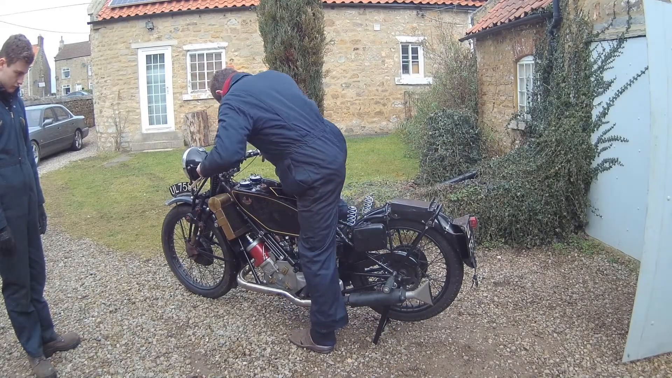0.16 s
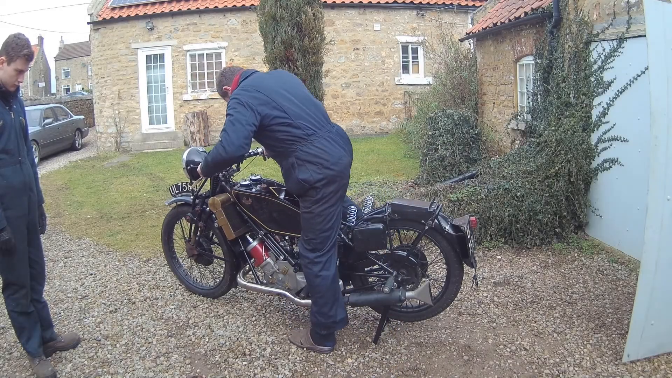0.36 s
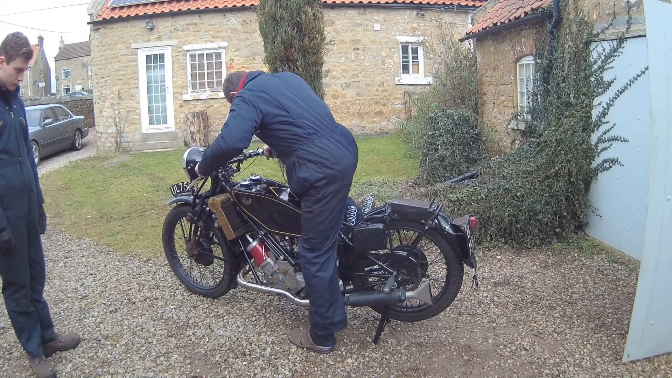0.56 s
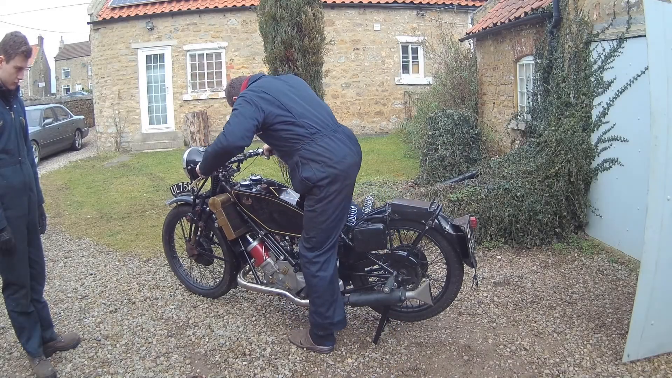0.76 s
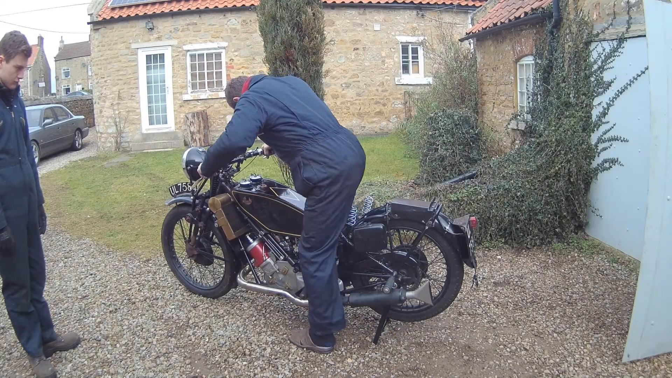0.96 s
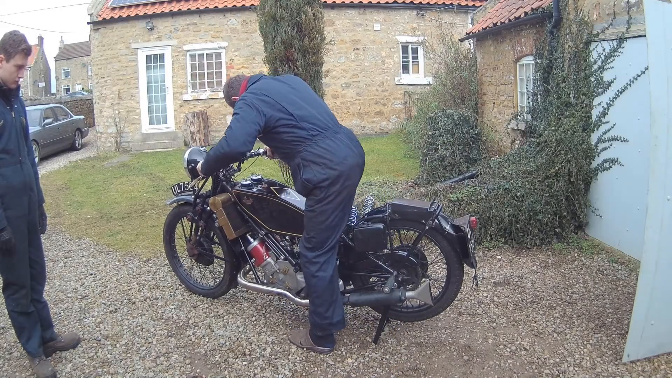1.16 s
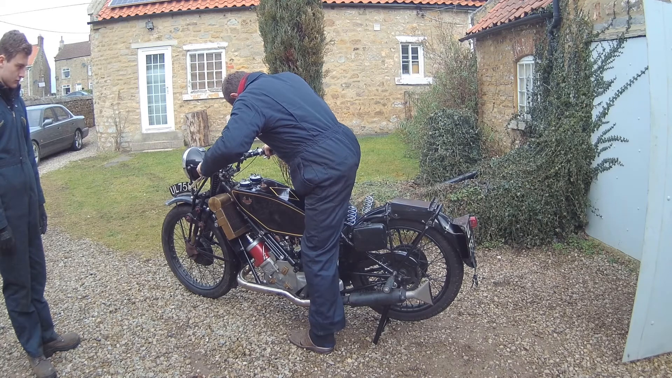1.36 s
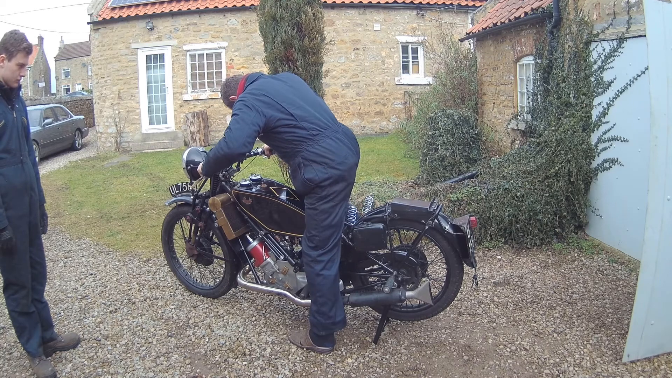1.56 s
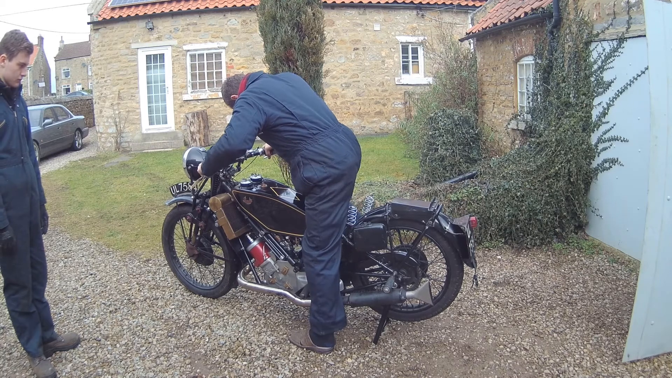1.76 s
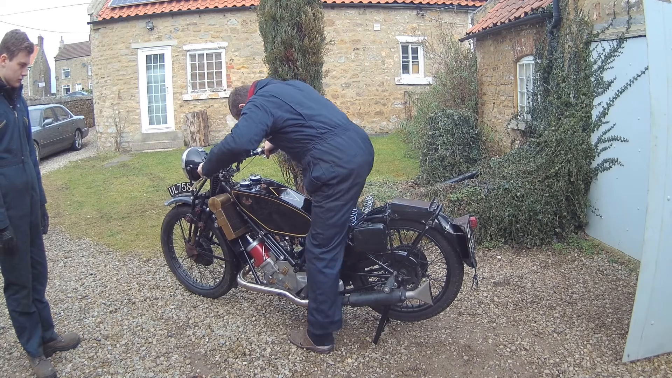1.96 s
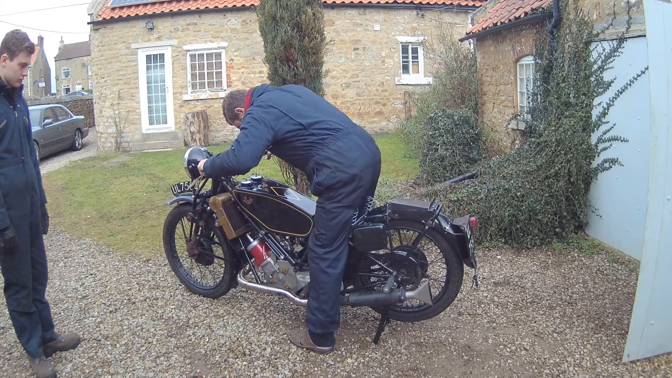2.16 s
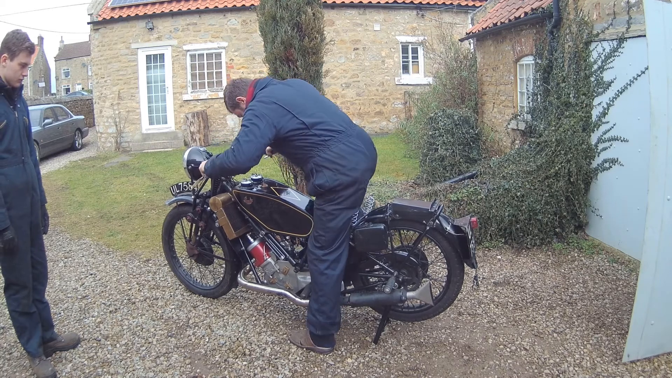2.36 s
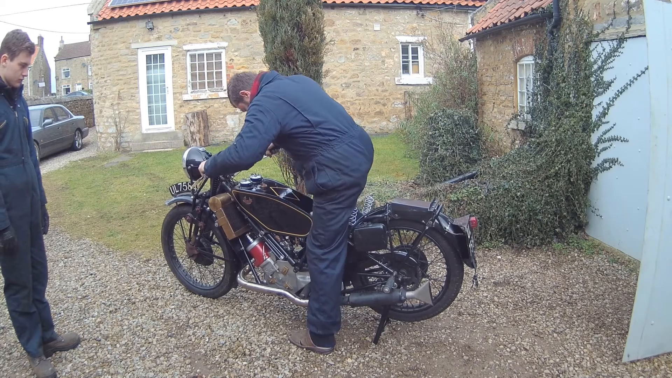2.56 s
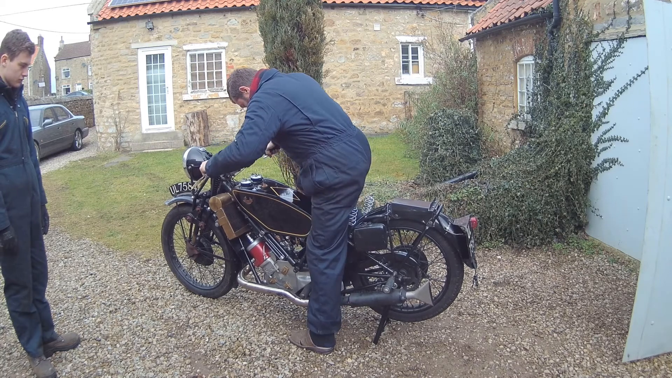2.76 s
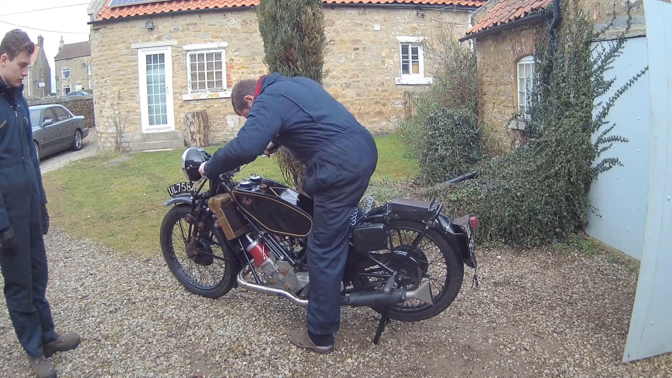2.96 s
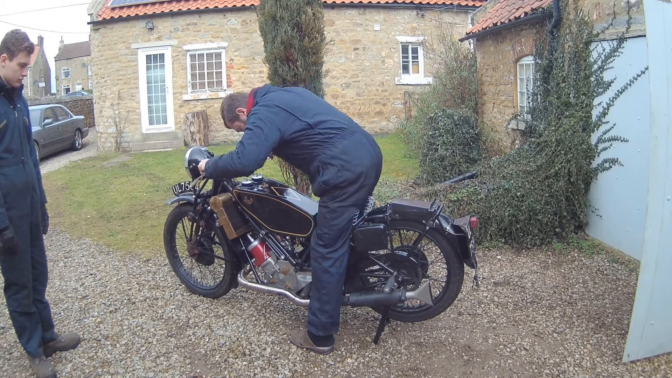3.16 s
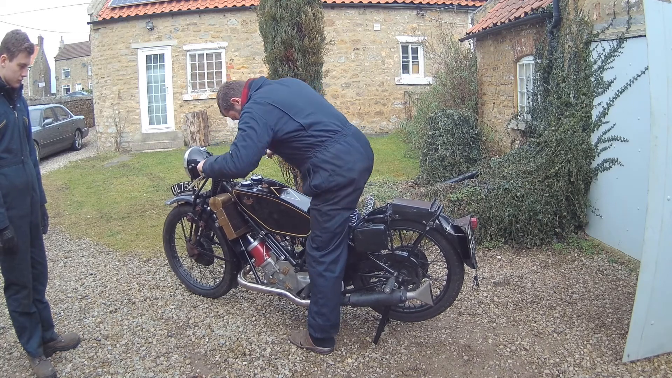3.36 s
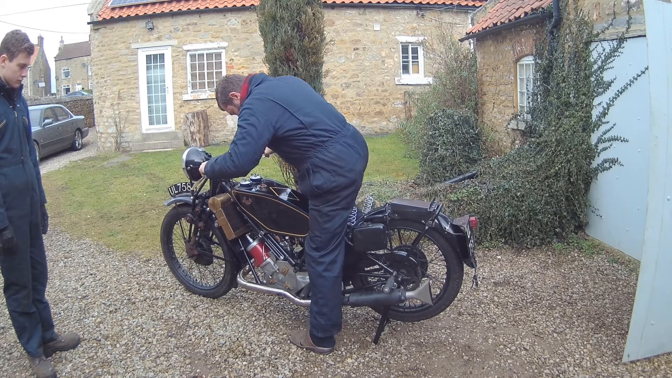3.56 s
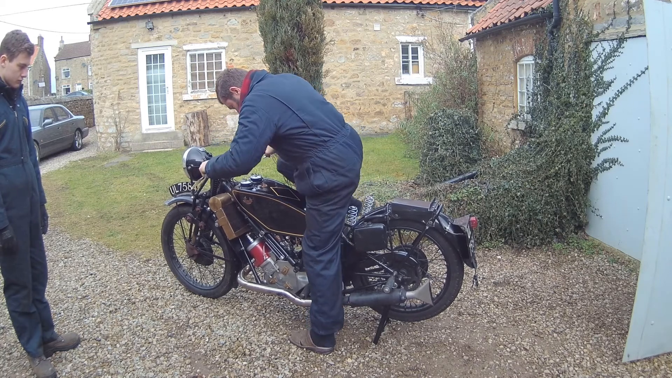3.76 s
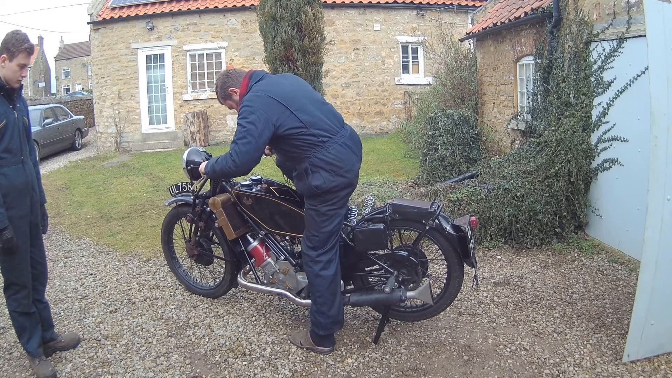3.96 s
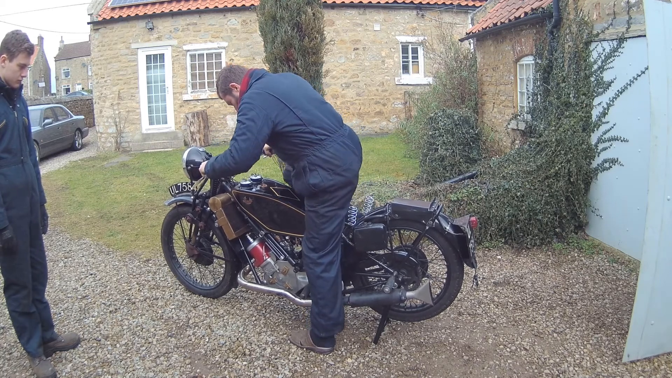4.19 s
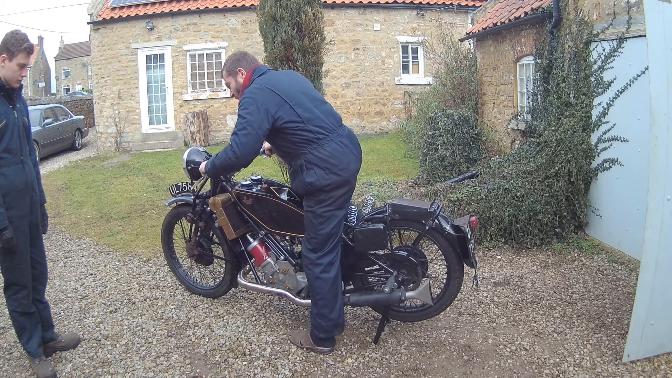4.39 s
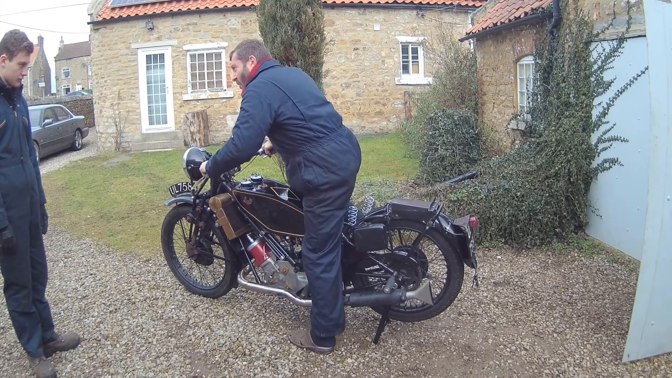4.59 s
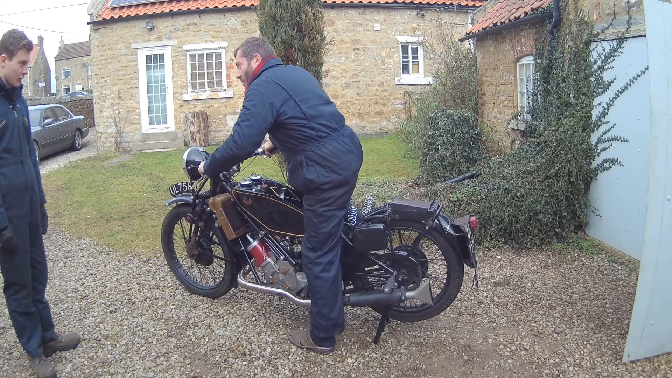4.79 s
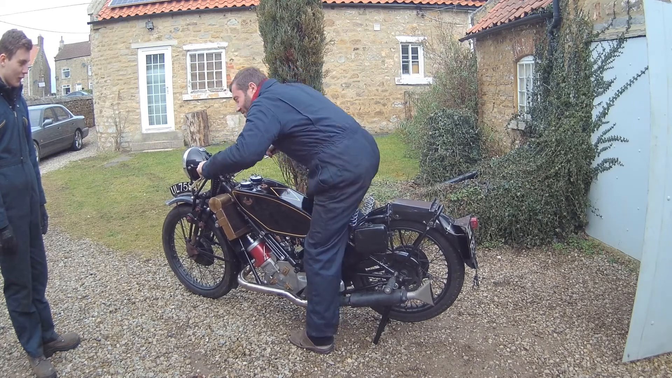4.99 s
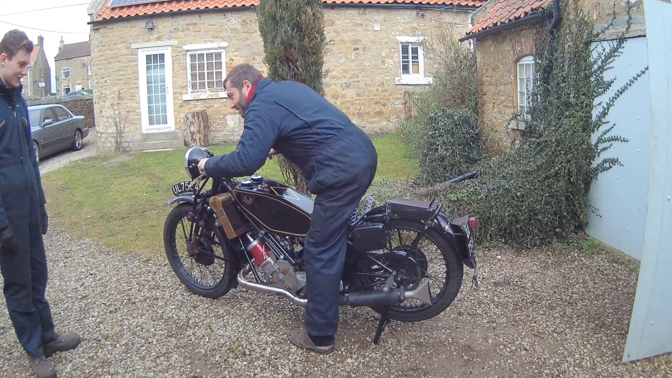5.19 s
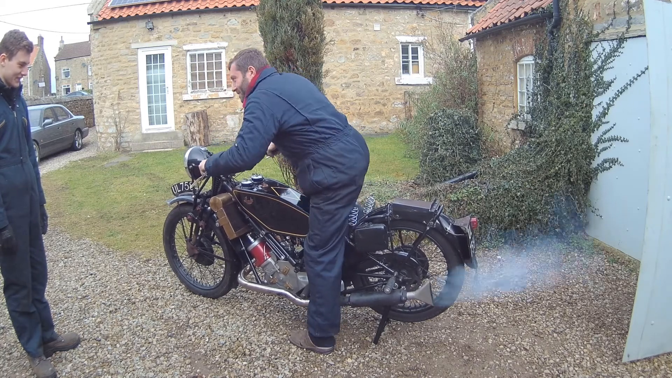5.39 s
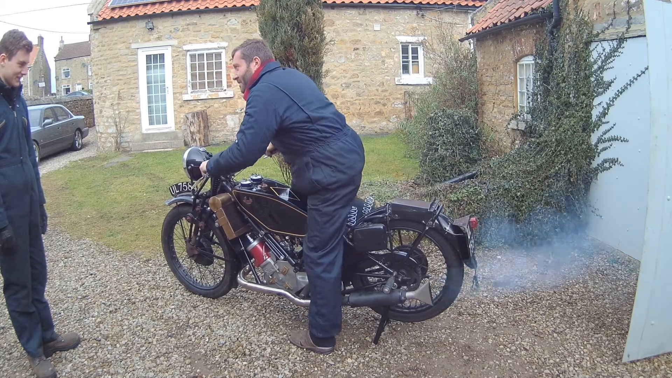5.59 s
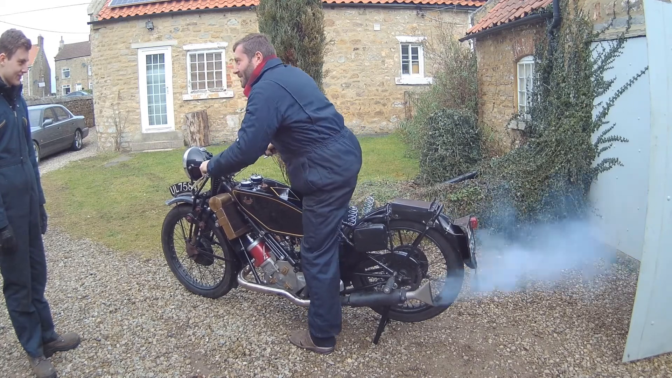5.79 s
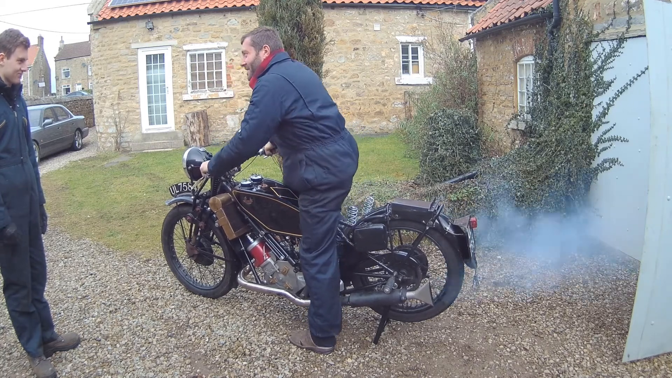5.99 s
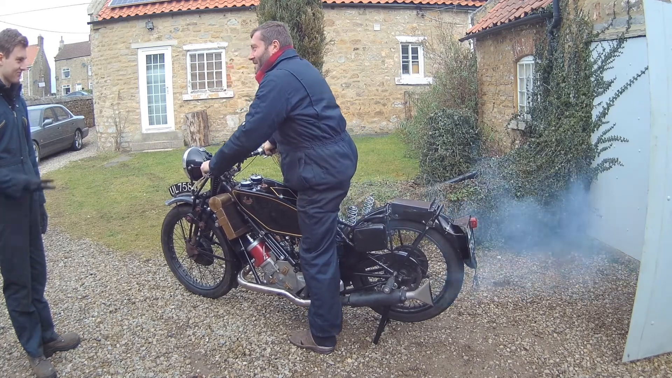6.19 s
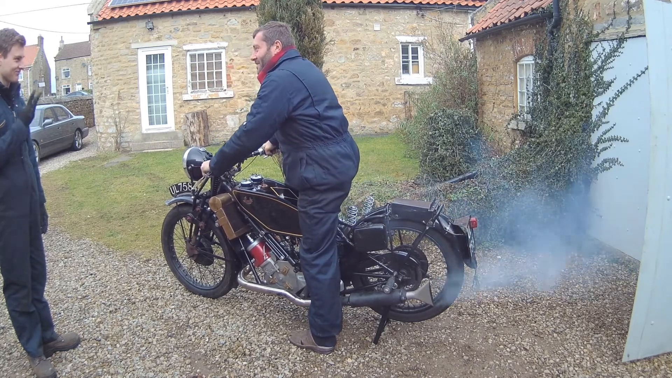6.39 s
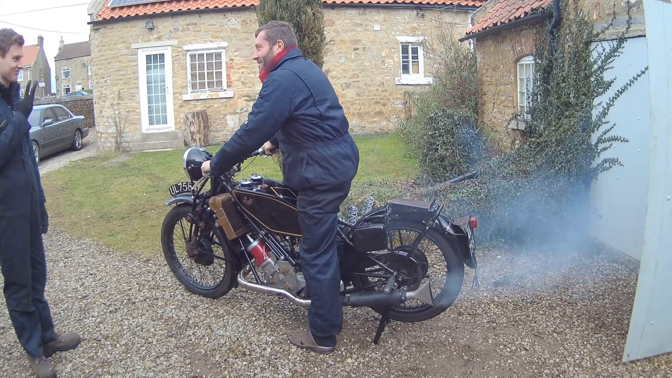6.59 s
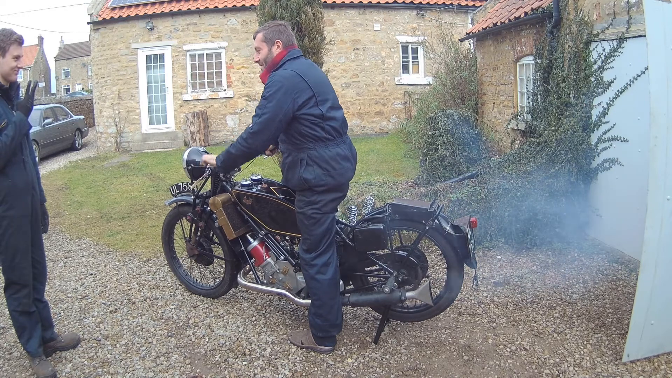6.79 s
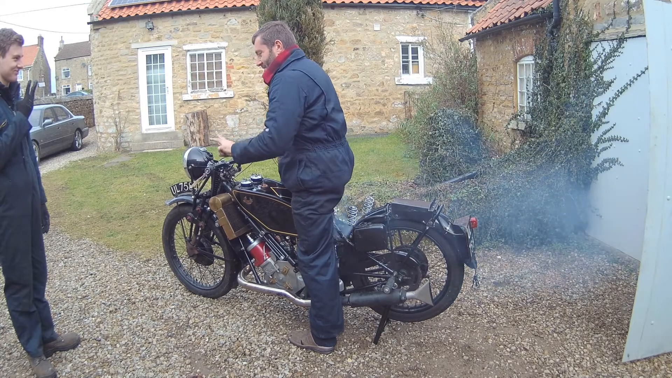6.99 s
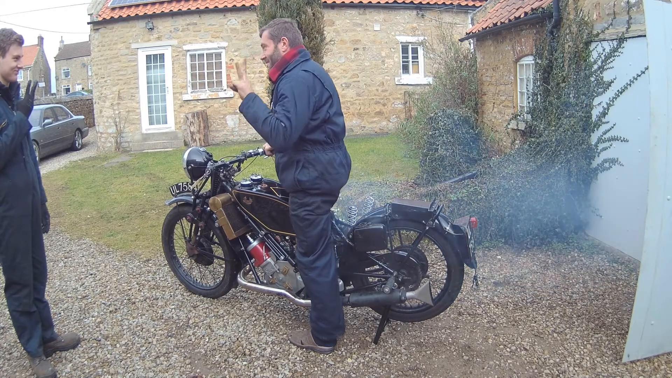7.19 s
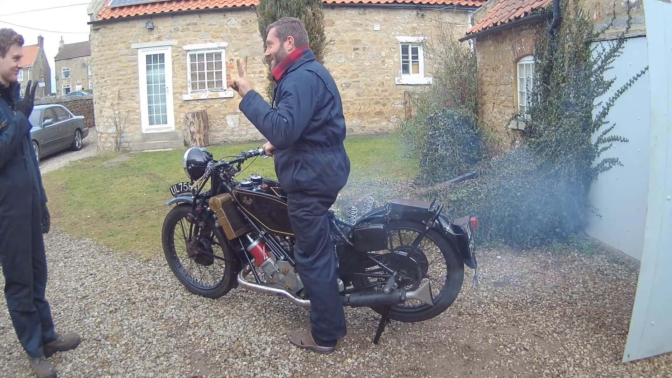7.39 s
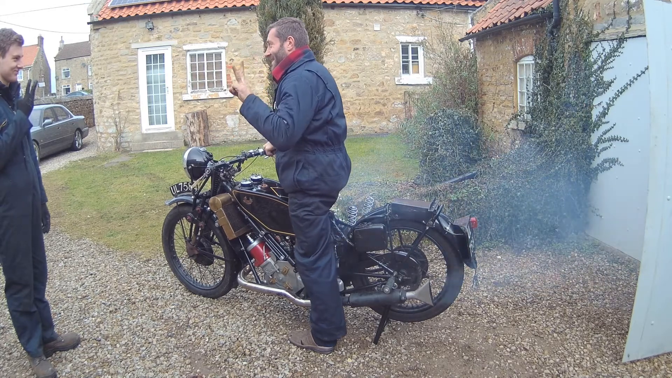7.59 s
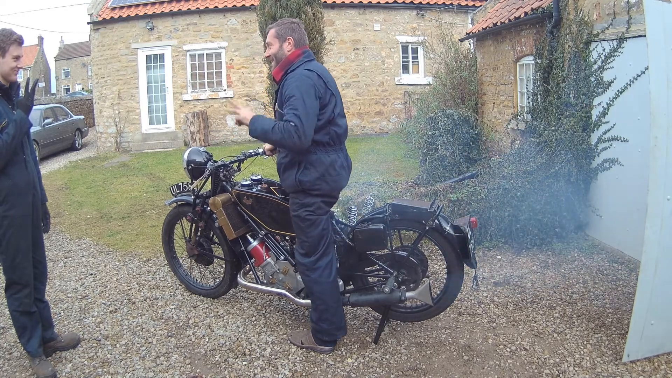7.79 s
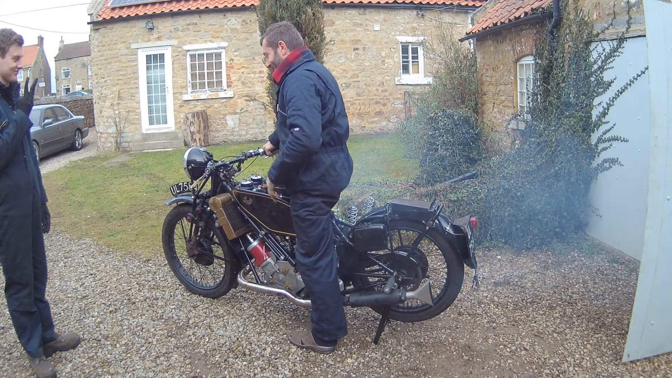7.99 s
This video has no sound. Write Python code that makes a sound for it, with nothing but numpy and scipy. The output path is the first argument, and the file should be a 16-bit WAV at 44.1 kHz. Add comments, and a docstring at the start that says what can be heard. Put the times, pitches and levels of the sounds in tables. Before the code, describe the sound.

A kick lever clicks and thumps, a cold engine chuffs, then the old motorcycle fires into a fast, uneven, popping idle.

```python
"""An old two-stroke motorcycle is kick-started in a gravel yard between stone walls.
The kick lever clicks, squeaks and thumps, the chain rattles, the cold engine chuffs.
Then it catches and idles in ragged volleys of pops that ring the exhaust pipe and silencer.
The walls throw every pop back, and the sharpest ones overload the microphone.
A faint high chirp and a faint low coo sound before the engine catches."""
import sys
import numpy as np
from scipy import signal
from scipy.fft import rfft, irfft
from scipy.io import wavfile
from scipy.ndimage import uniform_filter1d

SR = 44100
rng = np.random.default_rng(int(sys.argv[2]) if len(sys.argv) > 2 else 0)


def waveform_to_disk(signal):
    """Save audio, clipped to [-1, 1], as 16-bit WAV at the path in sys.argv[1]."""
    frames = np.transpose(np.atleast_2d(signal))
    scaled = np.clip(frames, -1, 1) * 32767
    samples = np.round(scaled).astype(np.int16)
    wavfile.write(sys.argv[1], SR, samples)


N = 355005
TIME = np.arange(N) / SR

# lever, ratchet and control contacts: (time [s], level [dB], treble [dB])
CONTACTS = [(0.252, -44, -50.5), (0.579, -58.5, -32), (0.648, -69, -31), (0.833, -57.5, -7.5),
            (0.895, -49, -22.5), (1.301, -45.5, -4), (1.338, -51.5, 2.5), (1.56, -50, -44),
            (2.027, -39.5, -8.5), (2.103, -41, -8), (2.145, -61, 9.5), (2.231, -59.5, 6.5),
            (2.345, -54, 3.5), (2.399, -57, 7), (2.45, -54, 5.5), (2.635, -46.5, -35), (3.051, -44, -6.5),
            (3.181, -50, 6), (3.254, -46.5, 3.5), (3.384, -47.5, 7), (3.46, -55.5, 9.5), (3.564, -29, -16),
            (3.623, -42, -14.5), (3.699, -44.5, -40), (3.781, -54, -59), (3.933, -55, -16.5),
            (4.178, -42, -49), (5.04, -40, -8)]
# foot pushes on the lever: (time [s], length [s], chain rattle [dB], crank rumble [dB])
FOOT_PUSHES = [(0.0, 0.093, -65, -93), (0.586, 0.21, -77, -78), (0.839, 0.018, -68, -76.5),
               (0.888, 0.021, -60.5, -57.5), (2.005, 0.059, -53, -44.5), (2.274, 0.141, -68, -71.5),
               (3.048, 0.5375, -48, -45), (5.035, 0.093, -51, -39.5)]
# knock and rumble spectrum: (frequency [Hz], level [dB])
THUMP_SPECTRUM = [(20, 5.5), (45, -7.5), (100, 1.5), (190, 1.5), (300, -7), (700, -35), (3000, -58.5)]


def strokes(jitter_s=.00025, spread_db=1.502, sputter_db=-37, sputter_spread_db=11):
    """Pulse trains of firings and misses; strokes between volleys barely burn."""
    # one pop per stroke: (time [s], pops [count], period [s], first level [dB], change per pop [dB])
    volleys = [(5.087, 1, .035, -11.5, 0), (5.121, 1, 0.0306, -6.5, -0.5), (5.183, 1, .027, -9.5, 0),
               (5.209, 4, 0.0238, -4.5, -1), (5.298, 4, 0.0189, -3.5, 0.5), (5.370, 4, 0.01462, 0, 0),
               (5.462, 1, .016, -7, 11), (5.494, 2, 0.01618, -2, 0.5), (5.595, 2, 0.01628, -0.5, 2),
               (5.662, 5, 0.01498, 1.5, -1.09), (5.748, 2, 0.01278, 1, 1), (5.803, 3, 0.01393, -3, 1),
               (5.873, 3, 0.01508, -8.5, 4), (6.039, 1, .018, -12, -6), (6.076, 1, 0.0179, 0, -9),
               (6.151, 1, 0.0182, -.5, -10.5), (6.233, 1, 0.026, -0.5, -0.5), (6.276, 1, .019, -5.5, 0),
               (6.295, 2, .021, 0, -7.5), (6.354, 2, 0.0185, -3, 3.5), (6.391, 4, 0.01796, -5.5, 1.235),
               (6.494, 2, .018, -3.5, 3), (6.544, 4, 0.01812, -9, 2.5), (6.648, 3, 0.0172, 0, -0.5),
               (6.718, 2, 0.01682, -7.5, 7.5), (6.77, 6, 0.01782, -3.5, -.5), (6.892, 1, 0.0169, -11, 11),
               (6.928, 4, .0187, -8.5, 1.5), (7.061, 1, 0.0176, 0.5, -8.5), (7.102, 1, 0.01815, -5, -0.5),
               (7.188, 1, 0.02, -1.5, 0.5), (7.281, 1, 0.0204, -12, 0.5), (7.33, 2, 0.02486, -7.5, 6),
               (7.4, 3, 0.02227, -6, 1.5), (7.507, 3, 0.02057, -2, -3.5), (7.57, 4, 0.01916, -2, -2),
               (7.651, 3, 0.019, -2, -7.5), (7.73, 2, 0.02107, -1, -1.5), (7.789, 3, .0195, -9, 2),
               (7.886, 4, 0.01997, -1, -1.5), (8.024, 2, 0.0202, -3, 0.5)]
    fired, missed = np.zeros(N), np.zeros(N)
    next_starts_s = [row[0] for row in volleys[1:]] + [N / SR]
    for (s, pops, period_s, db, change_db), next_s in zip(volleys, next_starts_s):
        pops_s = s + period_s * np.arange(pops) + jitter_s * rng.standard_normal(pops)
        for k, pop_s in enumerate(pops_s):
            add(fired, pop_s, amp([db + k * change_db + spread_db * rng.normal()]))
        turns = max(round((next_s - pops_s[-1]) / period_s), 1)
        for miss_s in np.linspace(pops_s[-1], next_s, turns + 1)[1:-1]:
            add(missed, miss_s, np.ones(1))
            add(fired, miss_s, amp([sputter_db + sputter_spread_db * rng.normal()]))
    return fired, missed


def firings(fired, missed, turbulence=0.588, miss_db=-22, sizzle_db=-19.5, pump_db=-27, port_hz=4600):
    """A firing is a pressure step with eddies and metal sizzle; a miss spits; every stroke pumps."""
    # exhaust blast: (frequency [Hz], level [dB])
    blast_spectrum = [(25, -24.5), (60, -5.5), (150, -2.5), (320, -1.5), (450, -6), (530, -5.5),
                      (650, -3.5), (800, -3), (1100, -3), (1500, -0.5), (2500, -2), (2850, -2.5),
                      (3300, -19.5), (4500, -25.5), (7800, -46.5), (9700, -25.5), (12000, -49),
                      (16000, -53)]
    # shaken cooling fins and fittings: (frequency [Hz], level [dB])
    fin_spectrum = [(1500, -42), (3000, 15.5), (4500, 0.5), (6000, -6), (7800, -25), (9700, -3.5),
                    (11500, -15), (16000, -25.5)]
    # crankcase pumping: (frequency [Hz], level [dB])
    pump_spectrum = [(25, 19), (50, 7), (90, 10), (190, 5.5), (310, 0.5), (450, 2), (530, -9), (640, 1.5),
                     (900, -23.5), (1450, -19.5), (2700, -40.5), (4000, -28), (16000, -59.5)]
    eddies = turbulence * wake(fired, fade_s=0.001004) + amp(miss_db) * wake(missed, fade_s=0.00154)
    pressure = fired + passband(eddies, 600, "high")
    blasts = passband(convolve(pressure, impulse(blast_spectrum)), port_hz, "low")
    sizzle = convolve(wake(fired, fade_s=0.00604), impulse(fin_spectrum))
    pumping = convolve(np.sign(fired), impulse(pump_spectrum))
    return blasts + amp(sizzle_db) * sizzle + amp(pump_db) * pumping


def bark(fired, rise_width_hz=1400):
    """The pipe mouth rings for a few cycles, growing faster than the firing strength."""
    # mouth modes: (frequency [Hz], width [Hz], gain [dB], growth [exponent])
    mouth_modes = [(1474.2, 177, 24.5, 1.436), (2269.8, 278, 29.5, 1.328)]
    return sum(amp(db) * resonate(resonate(fired ** growth, hz, width_hz), hz, rise_width_hz)
               for hz, width_hz, db, growth in mouth_modes)


def exhaust_pipe(gas):
    """Gas rings the pipe; hotter gas carries sound faster and raises the standing waves."""
    # standing waves when hot: (frequency [Hz], width [Hz], gain [dB])
    pipe_modes = [(179.7, 50.7, 7.5), (246.4, 50, -4), (308, 23.8, 11.5), (446.1, 20.95, 12),
                  (521.4, 20, -15), (659.75, 32.8, 13), (790.7, 35, 5), (1018.8, 27.5, 8)]
    # pitch drift with gas heat: (time [s], share of hot pitch [ratio])
    heat_tuning = [(5.1, 0.969), (5.2, .88), (5.3, 0.9534), (5.41, 0.999), (5.47, 0.99), (5.53, 0.994),
                   (5.58, 0.957), (5.69, 0.995), (5.85, 1.0), (6.1, 0.956), (6.45, 0.991), (6.97, 0.995),
                   (7.25, 0.9724), (7.9, 1.018)]
    pipe_time_s = np.cumsum(curve(heat_tuning)) / SR   # warped clock shifts all modes together
    inside = np.interp(TIME, pipe_time_s, gas)
    ringing = colour(inside, pipe_modes) - inside
    return gas + np.interp(pipe_time_s, TIME, ringing)


def silencer(gas):
    """The steel can adds resonances of constant pitch."""
    # steel modes: (frequency [Hz], width [Hz], gain [dB])
    steel_modes = [(1080, 40, -4), (1150, 24, 7), (1287, 22, 12), (1360, 30, -5), (1430, 36, 10),
                   (1490, 24, 5), (1630, 36, 6), (1708, 26, 6), (1830, 50, -4), (2010, 50, -5),
                   (2100, 24, 9), (2210, 24, 6), (2495, 30, 7), (2565, 24, 9), (2788, 30, 10),
                   (3560, 90, 7)]
    return colour(gas, steel_modes)


def afterburn():
    """Mixture burning on in the pipe roars briefly."""
    # late flames: (time [s], level [dB], fade [s])
    flames = [(5.389, -23.5, 0.0122), (5.616, -19, 0.0046), (5.677, -19, 0.0263), (5.816, -25.5, 0.007),
              (5.875, -15, 0.009), (6.946, -9.5, 0.0066)]
    # flame roar: (frequency [Hz], level [dB])
    flame_spectrum = [(60, -2), (400, -8.5), (1500, -0.5), (2700, 4), (4000, -13.5), (6500, -19),
                      (8000, -24), (9700, -13.5), (16000, -81.5)]
    envelope = sum(amp(db) * (TIME > s) * np.exp(-np.abs(TIME - s) / fade_s) for s, db, fade_s in flames)
    return envelope * noise(flame_spectrum)


def chuffs(turbulence=1.817):
    """The cold engine lets out unfired compression in dull puffs."""
    # releases: (time [s], level [dB], fade [s])
    releases = [(3.110, -20, 0.0038), (3.323, -26.5, 0.0106), (3.539, -25.5, 0.0073),
                (3.561, -29.5, 0.0114)]
    # cold puff: (frequency [Hz], level [dB])
    puff_spectrum = [(30, -42.5), (150, 1.5), (400, -4), (900, -1), (1600, -5), (2700, -3.5), (4000, -20),
                     (7000, -35.5), (10000, -25), (15000, -72)]
    out = np.zeros(N)
    for s, db, fade_s in releases:
        add(out, s, amp(db) * puff(turbulence, fade_s))
    return convolve(out, impulse(puff_spectrum))


def lever(contacts, ring_db=-2, spread_db=2):
    """Contacts ring the same steel parts, each mode at a random strength."""
    # lever and footrest modes: (frequency [Hz], width [Hz], gain [dB])
    lever_modes = [(850, 36, -19.5), (1709, 67, -0.5), (1980, 114, 3.5), (2200, 55, -3.5), (2783, 68, -6.5),
                   (3490, 110, -8), (3950, 146, -6), (4777, 110, 1)]
    return contacts + sum(amp(ring_db + db + spread_db * rng.normal()) * resonate(contacts, hz, width_hz)
                          for hz, width_hz, db in lever_modes)


def clicks(edge_hz=3500, sharp_db=15):
    """Steel parts meet, chatter and ring; hard contacts keep their treble."""
    # steel click: (frequency [Hz], level [dB])
    click_spectrum = [(80, -19.5), (280, 2), (900, 6.5), (1500, 1.5), (2500, 3), (4000, -11), (5500, -23.5),
                      (7500, -30.5), (10000, -27), (15000, -49)]
    out = np.zeros(N)
    for s, db, treble_db in CONTACTS:
        contact = lever(puff(roughness=2.615, fade_s=0.00875))
        add(out, s, amp(db) * shelf(contact, edge_hz, amp(treble_db + sharp_db)))
    return convolve(out, impulse(click_spectrum))


def thumps():
    """The kicked crank knocks through frame and stand, which shake briefly."""
    # knocks: (time [s], level [dB])
    knocks = [(0.892, -40.5), (2.021, -32.5), (2.095, -31), (3.048, -31.5), (3.112, -23), (3.25, -34.5),
              (3.322, -23.5), (3.385, -30.5), (3.457, -31), (3.538, -23), (3.612, -30.5), (5.032, -28.5)]
    out = np.zeros(N)
    for s, db in knocks:
        add(out, s, amp(db) * puff(roughness=0.57, fade_s=0.015))
    return convolve(out, impulse(THUMP_SPECTRUM))


def chain_force(caught_s=5.085, ramp_s=0.0041, running_db=-43, shaken_db=-19):
    """The chain shakes under the foot, around each click, and steadily once the engine runs."""
    pushed = sum(amp(db) * swell(s, length_s, rise_db_per_s=250.5, fall_db_per_s=137)
                 for s, length_s, db, _ in FOOT_PUSHES)
    shaken = sum(amp(db + shaken_db) * swell(s, 0, rise_db_per_s=900, fall_db_per_s=190)
                 for s, db, _ in CONTACTS)
    running = np.clip((TIME - caught_s) / ramp_s + 1, 0, 1)
    return pushed + shaken + amp(running_db) * running


def chain(links_per_s=450, rub_db=-8, full_treble_db=-43):
    """Links ring the lever parts over a rubbing noise, brighter when shaken harder."""
    # chain rattle: (frequency [Hz], level [dB])
    rattle_spectrum = [(150, -27.5), (260, -7.5), (450, 0), (900, -6.5), (1350, -6.5), (2300, -6.5),
                       (3900, -18.5), (5200, -28), (7500, -37), (9800, -25.5), (12500, -56.5),
                       (16000, -64.5)]
    hits = (rng.random(N) < links_per_s / SR) * rng.choice([-1, 1], N)
    links = rms_one(convolve(lever(hits), impulse(rattle_spectrum)))
    rattle = links + amp(rub_db) * noise(rattle_spectrum)
    force = chain_force()
    hardness = np.minimum(force / amp(full_treble_db), 1)
    return force * shelf(rattle, edge_hz=3700, treble_gain=hardness)


def crank():
    """The crank rumbles while it is kicked over."""
    turning = sum(amp(db) * swell(s, length_s, rise_db_per_s=551, fall_db_per_s=88)
                  for s, length_s, _, db in FOOT_PUSHES)
    return turning * noise(THUMP_SPECTRUM)


def short_tones(width_hz=120, upper_hz=3050, upper_db=-14):
    """Short narrow-band tones: lever squeaks, a faint high chirp, a faint low coo."""
    # tones: (time [s], length [s], frequency [Hz], level [dB])
    tones = [(0.639, 0.0285, 1898, -56.5), (0.881, 0.0425, 2746, -56), (1.79, 0.091, 3110, -83.5),
             (2.97, 0.108, 1704, -59), (4.803, 0.214, 670.8, -76.5), (4.937, 0.083, 1748, -57)]
    out = np.zeros(N)
    for s, length_s, hz, db in tones:
        white = rng.standard_normal(SR // 4)
        bands = resonate(white, hz, width_hz) + amp(upper_db) * resonate(white, upper_hz, width_hz)
        tone = rms_one(passband(bands, 3300, "low"))[:int(length_s * SR)]
        add(out, s, amp(db) * tone * signal.windows.tukey(len(tone), .25))
    return out


def yard(x, onset_s=.006, near_db=2, far_db=-14):
    """Direct sound, wall echoes, scatter from gravel and hedges, a faint tail between houses."""
    # ground and wall reflections: (delay [s], level [dB])
    echoes = [(.0062, -7.5), (.0072, -14), (.0119, -10.5), (.0132, -9), (.0182, -16), (0.0204, -10.5),
              (.035, -19.5), (0.0447, -20), (0.0523, -16.5)]
    response = np.zeros(SR)
    response[0] = 1
    for delay_s, db in echoes:
        add(response, delay_s, amp([db]))
    add(response, onset_s, amp(near_db) * passband(scatter(fade_s=0.015), 250, "high"))
    add(response, onset_s, amp(far_db) * passband(scatter(fade_s=0.13), 4000, "low"))
    return convolve(x, whiten(response))


def background(air_db=-73.5, hum_db=-84.5, hum_hz=217.3, width_hz=14):
    """Still outdoor air and a faint far hum."""
    # outdoor air: (frequency [Hz], level [dB])
    air_spectrum = [(20, -9), (60, 0.5), (130, 0.5), (190, 3), (270, -1.5), (500, -4), (1000, -10),
                    (2000, -9), (3000, -12.5), (4500, -24.5), (11000, -21.5), (16000, -41)]
    air = noise(air_spectrum)
    hum = resonate(resonate(rng.standard_normal(N), hum_hz, width_hz), hum_hz, width_hz)
    return amp(air_db) * air + amp(hum_db) * rms_one(hum)


def puff(roughness, fade_s, size=4096):
    """A unit pulse with a decaying noise tail."""
    tail = rng.standard_normal(size) * np.exp(-TIME[:size] / fade_s)
    x = roughness * tail / np.linalg.norm(tail)
    x[0] += 1
    return x


def wake(pulses, fade_s):
    """Turbulence dies away after every pulse; energy 1 for a unit pulse."""
    decay = np.exp(-1 / (fade_s * SR))
    envelope = np.sqrt(1 - decay ** 2) * signal.lfilter([1], [1, -decay], pulses + 1e-18)
    return envelope * rng.standard_normal(N)


def scatter(fade_s, size=32768):
    """Dense decaying reflections that favour no pitch; energy 1."""
    fade = np.exp(-TIME[:size] / fade_s)
    x = rng.standard_normal(size) * fade
    for _ in range(5):
        x = irfft(np.exp(1j * np.angle(rfft(x))))   # flatten the spectrum
        x = x * fade / np.sqrt(uniform_filter1d(x ** 2, size=256) + 1e-14)   # restore the decay
    return x / np.linalg.norm(x)


def whiten(response, size=16384):
    """Even out a response's spectrum at equal energy."""
    power = np.abs(rfft(response[:size]))[1:] ** 2
    for _ in range(3):
        power = uniform_filter1d(power, size=9)
    hz = np.arange(1, len(power) + 1) * SR / size
    inverse_spectrum = np.column_stack([hz, -10 * np.log10(power)])
    even = convolve(response, impulse(inverse_spectrum, size))
    return even * np.linalg.norm(response) / np.linalg.norm(even)


def impulse(spectrum, size=4096):
    """Minimum-phase pulse with this spectrum; peak 1."""
    hz, db = np.transpose(spectrum)
    grid_hz = np.maximum(np.arange(size // 2 + 1) * SR / size, 1)
    magnitude = amp(np.interp(np.log(grid_hz), np.log(hz), db))
    cepstrum = irfft(np.log(magnitude))
    cepstrum[1:size // 2] *= 2
    cepstrum[size // 2 + 1:] = 0
    pulse = irfft(np.exp(rfft(cepstrum)))
    return pulse / np.abs(pulse).max()


def noise(spectrum):
    return rms_one(convolve(rng.standard_normal(N), impulse(spectrum)))


def resonate(x, hz, width_hz):
    """Two-pole resonance; peak gain 1."""
    r = np.exp(-np.pi * width_hz / SR)
    feedback = [1, -2 * r * np.cos(2 * np.pi * hz / SR), r * r]
    return signal.lfilter(np.array([1, 0, -1]) * (1 - r * r) / 2, feedback, x + 1e-18)


def colour(x, modes):
    """Resonances in series, each lifting or cutting its band."""
    for hz, width_hz, db in modes:
        x = x + (amp(db) - 1) * resonate(x, hz, width_hz)
    return x


def shelf(x, edge_hz, treble_gain):
    """Scale the treble; the two bands are in antiphase, hence the minus."""
    return passband(x, edge_hz, "low") - treble_gain * passband(x, edge_hz, "high")


def passband(x, hz, kind):
    return signal.sosfilt(signal.butter(2, hz, kind, fs=SR, output="sos"), x)


def convolve(x, response):
    return signal.fftconvolve(x, response)[:len(x)]


def swell(s, length_s, rise_db_per_s, fall_db_per_s):
    """Gain that rises to 1 at time s, holds, then falls."""
    before_s = np.clip(s - TIME, 0, 1)
    after_s = np.maximum(TIME - s - length_s, 0)
    return amp(-rise_db_per_s * before_s - fall_db_per_s * after_s)


def curve(rows):
    return np.interp(TIME, *np.transpose(rows))


def add(out, s, sound):
    at = max(int(s * SR), 0)
    part = sound[:max(N - at, 0)]
    out[at:at + len(part)] += part


def amp(db):
    return 10 ** (np.asarray(db) / 20)


def rms_one(x):
    return x / np.sqrt(np.mean(x ** 2) + 1e-20)


def scene(bark_spread=0.263, firing_db=-1):
    """The motorcycle in the yard; the bark beams ahead, so little of it reaches the walls."""
    fired, missed = strokes()
    gas = amp(firing_db) * firings(fired, missed) + afterburn() + chuffs()
    crack = bark(fired)
    machine = silencer(exhaust_pipe(gas) + bark_spread * crack) + clicks() + thumps()
    return (crack + yard(machine + short_tones()) + chain() + crank() + background())[None]


def record(dry, ceiling=0.5345, knee=10, low_cut_hz=14, high_cut_hz=16000, dc_offset=-.0016):
    """The microphone flattens peaks; the level steps down once; bottom and top are cut."""
    # level step: (time [s], gain [dB])
    level_step = [(5.725, -1.5), (5.735, -5)]
    sound = passband(dry, low_cut_hz, "high")
    flattened = sound / (1 + np.abs(sound / ceiling) ** knee) ** (1 / knee)
    high_cut = signal.ellip(10, .1, 80, high_cut_hz, fs=SR, output="sos")
    return dc_offset + signal.sosfilt(high_cut, flattened * amp(curve(level_step)))


dry = scene()
out = record(dry)
waveform_to_disk(out)
```